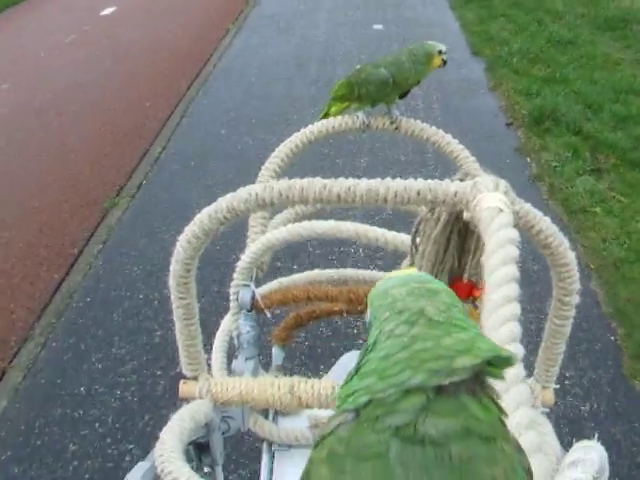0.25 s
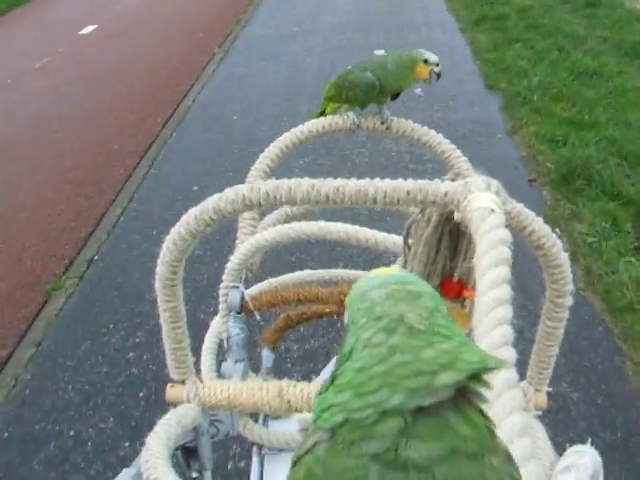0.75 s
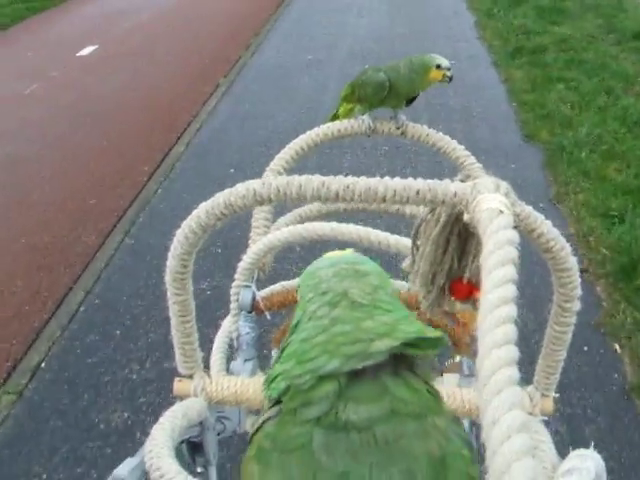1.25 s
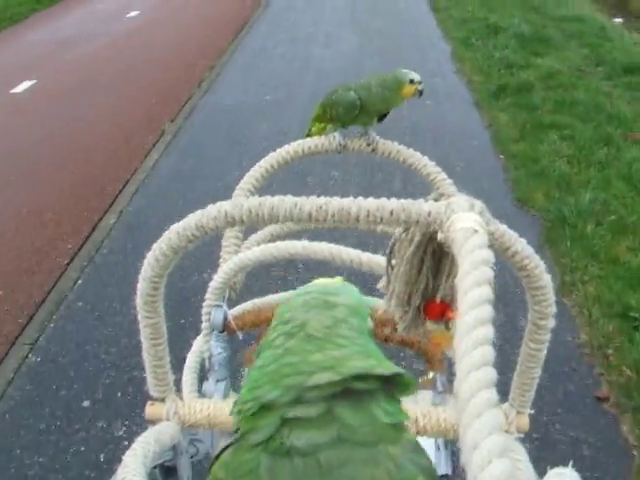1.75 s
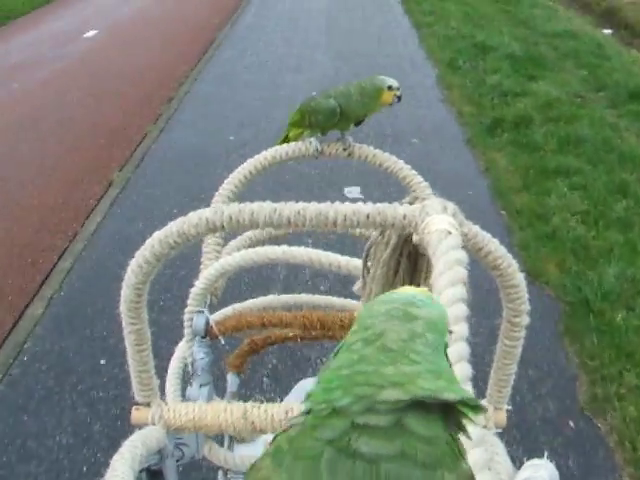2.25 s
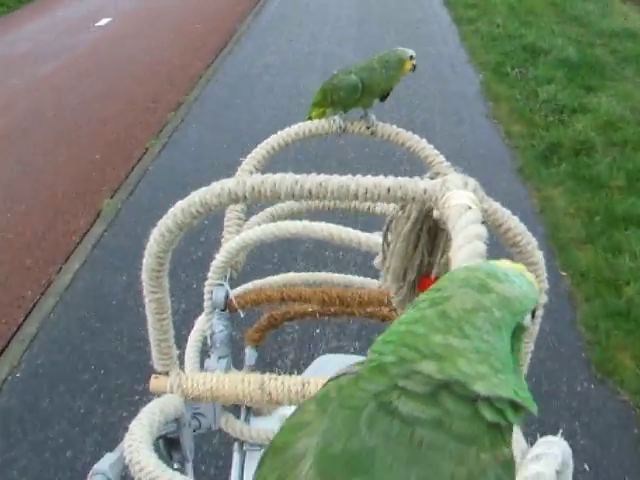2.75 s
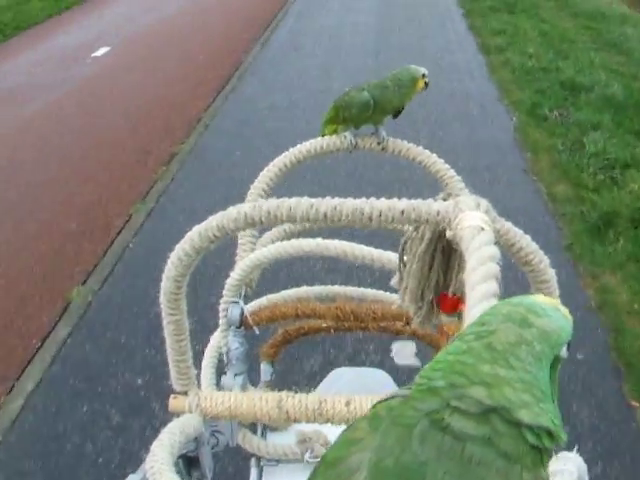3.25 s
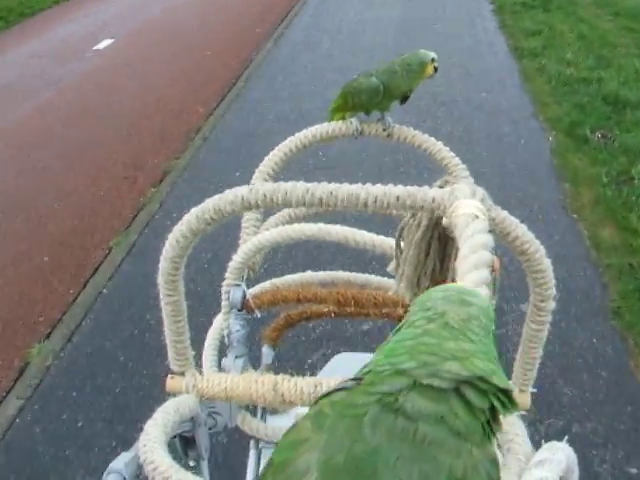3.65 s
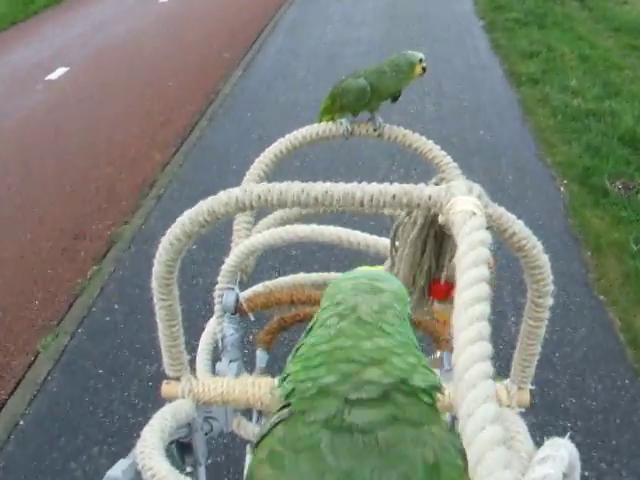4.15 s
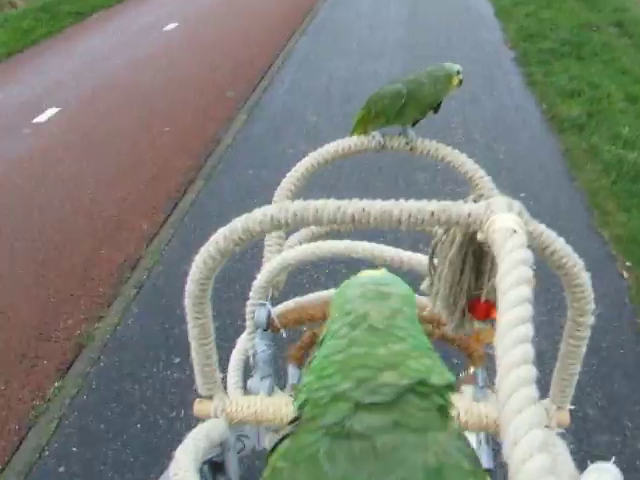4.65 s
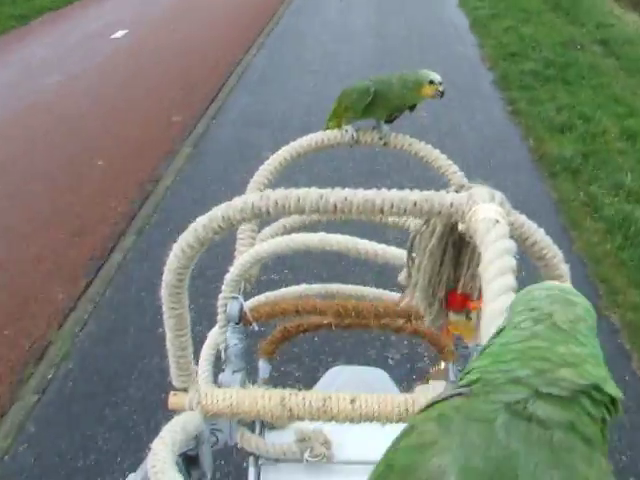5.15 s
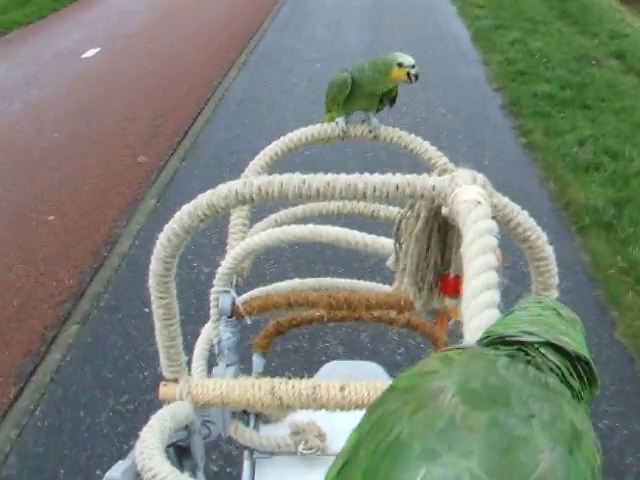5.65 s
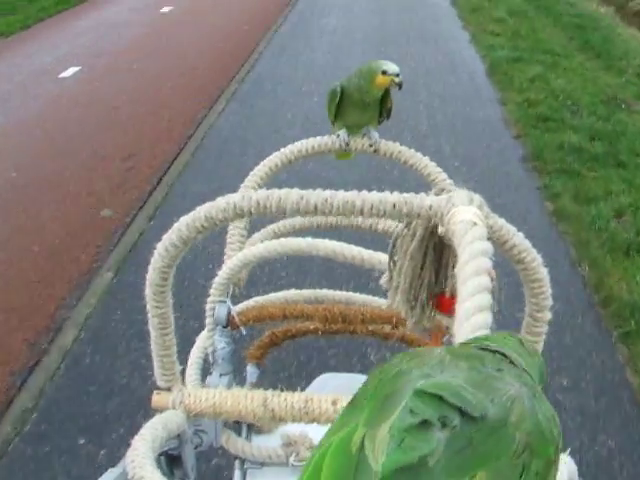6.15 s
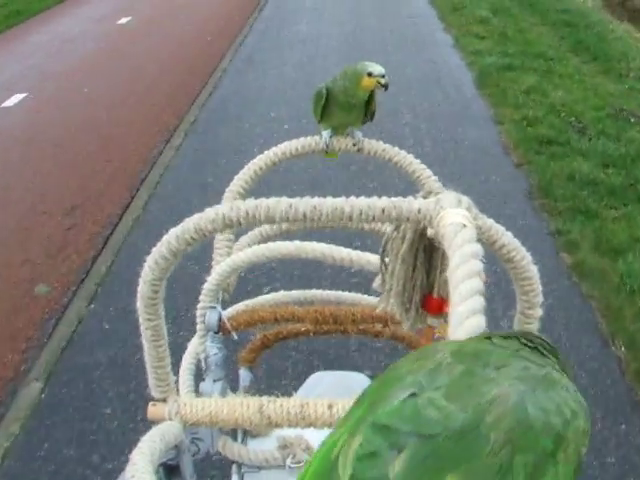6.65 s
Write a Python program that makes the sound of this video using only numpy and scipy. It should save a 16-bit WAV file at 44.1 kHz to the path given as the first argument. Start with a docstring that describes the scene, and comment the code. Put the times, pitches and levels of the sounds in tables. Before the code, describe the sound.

Short, piercing parrot screams repeat steadily outdoors, with wind buffeting the microphone and a faint hum and tyre hiss underneath.

```python
"""A parrot screams close to the microphone, nine times, from a rope perch on a cart rolling along an open path.
Each squawk swoops up through a rasp to a piercing held note, sometimes cracks upward, and ends in a
harsh scrape: membranes in the syrinx pulse, evenly or roughly, through the resonances of the throat.
Underneath, the drive hums, the tyres hiss on asphalt, wind buffets the microphone and bumps ring the frame."""
import sys
import numpy as np
from scipy import signal
from scipy.fft import rfft, irfft, next_fast_len
from scipy.io import wavfile
from scipy.ndimage import uniform_filter1d

SR = 44100
rng = np.random.default_rng(int(sys.argv[2]) if len(sys.argv) > 2 else 0)


def materialize(psi):
    """Save the field psi as 16-bit PCM at rate SR to the path in sys.argv[1].

    A 1-D psi becomes a single channel; in a 2-D psi each row is a channel.
    """
    bounded = np.clip(np.atleast_2d(psi).T, -1, 1)
    quanta = np.round(bounded * 32767).astype(np.int16)
    wavfile.write(sys.argv[1], SR, quanta)


N = 303849
TIME = np.arange(N) / SR


def from_db(db):
    """Decibels to gain."""
    return 10 ** (np.asarray(db) / 20)


def ramp(x):
    """Hold a progress between 0 and 1."""
    return np.clip(x, 0, 1)


def swell(centre_s, length_s):
    """A smooth bump of height 1."""
    return np.cos(np.pi * np.clip((TIME - centre_s) / length_s, -.5, .5)) ** 2


def in_time(rows):
    """Each column after the first (time_s), read at every sample."""
    time_s, *columns = np.transpose(rows)
    return [np.interp(TIME, time_s, column) for column in columns]


def rms_one(x):
    """Scale to unit rms."""
    return x / np.sqrt(np.mean(x ** 2) + 1e-20)


def evened(x, window_s=0.0043):
    """Hold the short-term rms at 1."""
    return x / np.sqrt(np.abs(uniform_filter1d(x ** 2, int(window_s * SR))) + 1e-12)


def filtered(x, order, edge_hz, kind="low"):
    """Causal low-, high- or band-pass."""
    return signal.sosfilt(signal.butter(order, edge_hz, kind, fs=SR, output="sos"), x)


def coloured(x, spectrum):
    """Minimum-phase filter through points of (frequency_hz, gain_db) on a log-frequency axis."""
    size = next_fast_len(N + SR // 2, real=True)
    bin_hz = np.arange(size // 2 + 1) * SR / size
    point_hz, point_db = np.transpose(spectrum)
    gain_db = np.interp(np.log(np.maximum(bin_hz, 1)), np.log(point_hz), point_db)
    cepstrum = irfft(np.log(from_db(gain_db)), size)
    cepstrum[1:size // 2] *= 2
    cepstrum[size // 2 + 1:] = 0
    return irfft(rfft(x, size) * np.exp(rfft(cepstrum)), size)[:N]


def noise(spectrum):
    """Coloured noise of unit rms."""
    return rms_one(coloured(rng.standard_normal(N), spectrum))


def drift(rate_hz):
    """Random wander of unit rms, up to the given rate."""
    return rms_one(filtered(rng.standard_normal(N + SR), 2, rate_hz)[SR:])


START_HZ, END_HZ = 381.3, 607.3   # the swoop rises from the first; the scrape sags to the second
BEAK_HALF_HZ, BEAK_WIDE_HZ = 684, 722   # the beak opens as the pitch climbs through this range
ONSET_ROUGH, SCRAPE_ROUGH = 0.34, 0.83
NOTE_DB, NOTE_SWELL_DB, RASP_DB = -16.5, 0.9, -18.5
# treble is the share of the voice's power above TREBLE_HZ
TREBLE_HZ, ONSET_TREBLE_DB, NOTE_TREBLE_DB = 3300, -18, -14.5
NOTE_DIMMING_DB, SCRAPE_DIMMING_DB = -1, -4


def squawk(start_s, swoop_s, note_s, scrape_s, climb_s, first_hz, last_hz, sag_hz,
           note_lift_db, treble_lift_db, rasp_treble_db, swoop_rough, note_rough,
           attack_s=0.043, step_s=.03, lock_s=0.011, break_s=0.02,
           hoarse_after_s=0.042, hoarse_span_s=0.017, brighten_s=0.047, full_bleat_hz=40.5):
    """Control curves of one call: the membranes swoop up, lock into a note and break into a scrape."""
    note_start, note_end, end = start_s + np.cumsum([swoop_s, note_s, scrape_s])
    t = np.linspace(start_s, end, 400)
    age = t - start_s
    holding = ramp((t - note_start) / note_s)
    falling = ramp((t - note_end) / scrape_s)
    note = first_hz + (last_hz - first_hz) * holding - sag_hz * np.sin(np.pi * holding)
    swoop = (START_HZ - first_hz) * np.exp(-age / climb_s) * ramp((note_start - t) / step_s)
    pitch = note + swoop + (END_HZ - last_hz) * np.sin(np.pi / 2 * falling)
    # air pressure builds over the attack and dies along the scrape
    pressure = ramp(age / attack_s) ** 1.48 * (1 - falling ** 1.5) ** 1.55
    swooping = ramp((note_start - t) / lock_s + .5)
    scraping = ramp((t - note_end) / break_s + .5)
    lock = 1 - swooping - scraping
    hoarse = ramp((age - hoarse_after_s) / hoarse_span_s + .5)
    early_rough = ONSET_ROUGH + (swoop_rough - ONSET_ROUGH) * hoarse
    rough = swooping * early_rough + lock * note_rough + scraping * SCRAPE_ROUGH
    # once open, the beak stays open to the end of the call
    opening = ramp((np.maximum.accumulate(pitch) - BEAK_HALF_HZ) / (BEAK_WIDE_HZ - BEAK_HALF_HZ))
    note_db = NOTE_DB + note_lift_db + NOTE_SWELL_DB * np.sin(np.pi * holding)
    level_db = lock * note_db + (1 - lock) * RASP_DB
    note_treble = NOTE_TREBLE_DB + treble_lift_db + NOTE_DIMMING_DB * (holding - .5)
    rasp_treble = np.interp(age, [0, brighten_s], [ONSET_TREBLE_DB, rasp_treble_db])
    rasp_treble += SCRAPE_DIMMING_DB * falling
    treble_db = lock * note_treble + (1 - lock) * rasp_treble
    bleat_hz = full_bleat_hz * note_rough * lock   # a rougher note wavers more
    return np.column_stack([t, pitch, pressure, rough, lock, opening, level_db, treble_db, bleat_hz])


def squeal(pitch, above_hz=820, span_hz=120):
    """How far, 0-1, the tongue lifts the main resonance along with a high note's third partial."""
    return ramp((pitch - above_hz) / span_hz)


# Partials of the syrinx when it swings evenly: harmonic_number, level_db
SYRINX_PARTIALS = [(1, 4.5), (2, 9.5), (3, 6), (4, 3.5), (5, 4.5), (6, 11), (7, 13), (8, 6), (9, 5.5),
                   (10, 12), (11, 6), (12, 2.5), (13, -16)]


def syrinx(pitch, rough, tremor=.0026, flutter=0.042, jitter_rad=0.43, shimmer=0.16,
           lag_rad=.23, air_db=-12, leak=.02, squeal_db=9, partials=19):
    """Membrane pulses: even when clean, uneven in timing and strength when rough."""
    tremble = rms_one(filtered(rng.standard_normal(N), 2, [35, 110], "band"))
    # slack membranes, low in the swoop, swing more regularly and with a flatter spectrum
    tension = ramp(pitch / BEAK_WIDE_HZ)
    pitch = pitch * (1 + (tremor + flutter * rough * tension ** 2) * tremble)
    cycle = 2 * np.pi * np.cumsum(pitch) / SR
    # a slower swing favours every second or third pulse
    subharmonics = drift(25) * np.cos(cycle / 2) + drift(25) * np.cos(cycle / 3)
    slow_swing = .26 * rough * tension ** 2 * subharmonics
    chaos = tension ** 3 * rough ** 1.3
    phase = cycle + jitter_rad * (chaos * drift(260) + slow_swing)
    evenness = ramp(1 - rough) * tension ** 4
    clean_db = np.interp(np.arange(1, partials + 1), *np.transpose(SYRINX_PARTIALS))
    partial_db = [evenness * db for db in clean_db]
    partial_db[2] += squeal_db * squeal(pitch)
    # upper partials lag, so each pulse is a tiny chirp that fills its cycle
    pulses = sum(from_db(db) * np.cos(k * phase - lag_rad * k * k) for k, db in enumerate(partial_db, 1))
    pulses = rms_one(pulses) * (1 + shimmer * chaos * drift(880) + slow_swing)
    # air rushes through once in every cycle
    air = filtered((1 + np.cos(phase)) * rng.standard_normal(N), 2, 1500, "high")
    return pulses + from_db(air_db) * (chaos * rough + leak) * air


# The windpipe with the beak half closed, and wide open: frequency_hz, gain_db
THROAT_HALF_CLOSED = [(350, -22), (590, -12.5), (850, -3.5), (1150, -7), (1650, -7), (2120, 4), (2500, -10),
                      (3150, -6), (3700, -4), (4400, -4.5), (4950, 2.5), (5600, -13.5), (6900, -14.5),
                      (8400, -35)]
THROAT_OPEN = [(400, -23), (660, -14), (950, -10), (1350, -9), (1900, -2), (2200, 8), (2500, -7.5),
               (3250, -8.5), (4050, 4), (4400, 1.5), (4850, 2.5), (5600, -3), (7200, -3.5), (8400, -23)]


def throat(pulses, opening, treble_db):
    """Windpipe and beak colour the pulses; the lows and the treble then share a steady power."""
    voice = opening * coloured(pulses, THROAT_OPEN) + (1 - opening) * coloured(pulses, THROAT_HALF_CLOSED)
    low = signal.sosfiltfilt(signal.butter(4, TREBLE_HZ, fs=SR, output="sos"), voice)
    share = np.clip(from_db(treble_db) ** 2, 0, .75)
    return np.sqrt(1 - share) * evened(low) + np.sqrt(share) * evened(voice - low)


# Breath at the beak: frequency_hz, density_db
BREATH_SPECTRUM = [(4000, -44.5), (7000, -31.5), (7900, 14), (8600, -22)]


def beak_hiss(pressure, opening, level_db=-56):
    """Air hisses through the beak until it opens wide."""
    return ramp(10 * pressure) * from_db(level_db) * (1 - opening) * noise(BREATH_SPECTRUM)


# The calls, close to the microphone, the first already under way: start_s, swoop_s, note_s, scrape_s,
# climb_s (time constant), first_hz, last_hz, sag_hz, note_lift_db, treble_lift_db, rasp_treble_db,
# swoop_rough (0-1), note_rough (0-1)
PARROT_CALLS = [ (-0.14, .12, 0.15, 0.073, .06, 787, 806.6, 4.1, -.5, 0, -7.5, .6, 0.13),
                (0.521, 0.09, 0.23, 0.061, 0.051, 783, 814, 1.7, 0, 2, -4.5, 0.6, 0.08),
                (1.272, .1, 0.23, 0.054, 0.067, 777.5, 763, 14, 0.4, 3, -4, 0.5, 0.13),
                (2.107, 0.11, 0.18, 0.063, 0.07, 768.2, 737.7, 5, -.5, 3, -4, .65, 0.05),
                (2.791, 0.14, .17, .046, 0.06, 751.4, 747.7, 17.2, 0.5, 0, -8, 0.59, 0.11),
                (3.452, 0.1, 0.19, 0.055, 0.054, 707.4, 724, 1.6, -0.5, 0, -8, 0.5, 0.07),
                (4.068, .132, .187, 0.047, .064, 705, 733, 8.4, -0.5, .5, -10, 0.37, 0.06),
                (4.708, .1, 0.23, 0.042, 0.041, 717.5, 762.4, 2.78, 2, -1, -11, .35, 0.12),
                (5.384, 0.16, 0.1, 0.076, 0.089, 831, 779, 5.7, 1.5, 0.5, -5.5, 0.8, 0.14), ]
# Moments when the voice cracks: centre_s, leap_hz, length_s, roughness_change
VOICE_CRACKS = [(0.03, 208.5, .029, 0.2), (0.059, 130, .028, 0), (0.087, 186, .045, 0.1),
                (0.634, -5, 0.045, .45), (0.741, -56, .055, 0.7), (0.802, 52.5, 0.0271, 0),
                (0.819, 58.5, 0.02056, 0.35), (1.499, 41.5, .017, .25), (1.556, 195, .03, 0.09),
                (1.585, 60, .045, 0), (2.98, 26, 0.013, 0), (3.009, 20, 0.0091, 0), (3.051, 17, 0.019, 0.1),
                (3.602, 32.5, .017, .15), (3.686, 38, .019, .05), (3.707, 48.5, .018, .2),
                (3.725, 24, .014, 0), (3.747, 21, .013, 0), (4.879, 41, .022, 0.2),
                (4.906, -5.5, 0.02, 0.2), (4.976, 82.5, .03, 0), (5.019, 114.5, .032, .4),
                (5.557, 151, .045, -.2), (5.608, 95.5, .027, -.1), (5.628, 146.5, .02, -.1)]


def parrot(slip_hz=761.5, slip_width_hz=28, slip_db=-4.5, slip_treble_db=11, crack_slip=.8, crack_db=-2.5,
           squeal_lift_db=5.0, squeal_treble_db=-3, waver_db=1.8, treble_waver_db=2.5):
    """Syrinx through the throat; a note that slips off the main resonance gets weaker and brighter."""
    curves = in_time(np.vstack([squawk(*call) for call in PARROT_CALLS]))
    pitch, pressure, rough, lock, opening, level_db, treble_db, bleat_hz = curves
    pitch += bleat_hz * drift(49)
    cracking = np.zeros(N)
    for centre_s, leap_hz, length_s, roughness_change in VOICE_CRACKS:
        crack = swell(centre_s, length_s)
        pitch += leap_hz * crack
        rough += roughness_change * crack
        cracking += crack
    # a high note or a crack loses the resonance; a squeal finds it again
    too_high = (1 + np.tanh((pitch - slip_hz) / slip_width_hz)) / 2
    slip = lock * np.maximum(too_high, ramp(crack_slip * cracking))
    level_db += slip_db * slip + crack_db * cracking + squeal_lift_db * squeal(pitch)
    treble_db += slip_treble_db * slip + squeal_treble_db * squeal(pitch)
    pulses = syrinx(pitch, np.clip(rough, 0, 1.1))
    # brightness and level waver more when the voice is strained
    strain = np.clip(.25 + 4 * rough, .25, 1)
    voice = throat(pulses, opening, treble_db + treble_waver_db * strain * drift(110))
    voice *= pressure * from_db(level_db + waver_db * strain * drift(66))
    return voice + beak_hiss(pressure, opening)


def open_air(x, ground_db=-24, ground_s=0.027, scatter_db=-35, scatter_t60_s=0.26):
    """The direct sound, one reflection off the path and a faint, dull scatter from the surroundings."""
    ground = np.interp(TIME - ground_s, TIME, x, left=0)
    t = TIME[:SR // 2]
    tail = filtered(rng.standard_normal(len(t)), 1, 2500) * from_db(-60 * t / scatter_t60_s)
    scatter = signal.fftconvolve(x, tail / np.sqrt(np.sum(tail ** 2)))[:N]
    return x + from_db(ground_db) * ground + from_db(scatter_db) * scatter


# Wind right on the microphone, its deep rumble and its buffeting: frequency_hz, density_db
RUMBLE_SPECTRUM = [(12, -14.5), (25, -10), (42, -6.5), (60, -12.5), (100, -12), (300, -78.5)]
BUFFET_SPECTRUM = [(30, -22), (60, -5.5), (88, -5), (125, -6.5), (175, -8.5), (250, -15), (400, -20),
                   (900, -52)]
# Gusts across the open path: centre_s, length_s, rumble_lift_db, buffet_lift_db
WIND_GUSTS = [(1.603, 0.56, 7, -2), (2.574, 0.26, 6.5, 7), (3.029, 0.49, 15.5, 10.5),
              (3.524, .2, 10.5, 10.5), (3.811, 0.36, 11.5, 4.5), (4.253, .2, 15.5, 4.5),
              (6.621, 0.64, 4, 4)]


def wind(rumble_db=-42, buffet_db=-44.5, lumps_db=2):
    """Lumpy turbulence at the microphone: a deep rumble and brighter buffets that follow the gusts."""
    for centre_s, length_s, rumble_lift_db, buffet_lift_db in WIND_GUSTS:
        gust = swell(centre_s, length_s)
        rumble_db += rumble_lift_db * gust
        buffet_db += buffet_lift_db * gust
    rumble = from_db(rumble_db + lumps_db * drift(5)) * noise(RUMBLE_SPECTRUM)
    buffets = from_db(buffet_db + lumps_db * drift(8.4)) * noise(BUFFET_SPECTRUM)
    return rumble + buffets


# Tones of the cart's drive: pitch_hz, level_db
DRIVE_TONES = [(60.7, -37), (224, -56.5)]


def drive_hum(speed_wobble=0.009, waver_db=2):
    """The drive turns at a nearly steady speed; each of its tones wavers in level."""
    turning_s = np.cumsum(1 + speed_wobble * drift(2.77)) / SR
    return sum(from_db(level_db + waver_db * drift(4)) * np.sin(2 * np.pi * pitch_hz * turning_s)
               for pitch_hz, level_db in DRIVE_TONES)


# Tyres and open air along the path: time_s, level_db
TYRE_LEVELS = [(0, -50), (1.1, -50.5), (3.3, -50), (4.6, -49.5), (5.9, -49.5), (6.89, -46.5)]
# Their colour at the microphone: frequency_hz, density_db
TYRE_SPECTRUM = [(180, -30.5), (300, -14.5), (404, -5.5), (452, -6), (600, -8), (917, -3.5), (1970, -13.5),
                 (3320, -16), (3880, -17), (7240, -18.5), (8100, -23), (8820, -86), (11500, -69),
                 (19400, -120)]


def tyre_hiss(texture_db=.9):
    """The tyres hiss over the asphalt, a little unevenly."""
    level_db, = in_time(TYRE_LEVELS)
    return from_db(level_db + texture_db * drift(8)) * noise(TYRE_SPECTRUM)


# Bumps in the path: start_s, level_db
PATH_BUMPS = [(1.779, -24), (2.555, -21.5), (2.59, -28), (3.019, -12.5), (3.041, -33), (3.148, -13.5),
              (3.211, -24), (3.845, -18.5)]
# Dull modes of the cart's frame: pitch_hz, level_db, t60_s
FRAME_MODES = [(96.7, 2, 0.056), (117.5, 3, 0.027), (166, -7.5, .06), (243, -10.5, 0.074), (326, -30, .04)]


def jolts(contact_s=0.0042, spread_db=1.5):
    """Each bump is a soft push that rings the frame, every mode with a strength of its own."""
    out = np.zeros(N)
    t = TIME[:SR // 4]
    for start_s, level_db in PATH_BUMPS:
        chance_db = rng.normal(0, spread_db, len(FRAME_MODES))
        thud = sum(from_db(level_db + mode_db + own_db - 60 * t / t60_s) * np.sin(2 * np.pi * hz * t)
                   for (hz, mode_db, t60_s), own_db in zip(FRAME_MODES, chance_db))
        start = round(start_s * SR)
        out[start:start + len(t)] += thud * (1 - np.exp(-t / contact_s))
    return out


def scene(parrot_db=2.5):
    """One microphone on an open path: the parrot close by, wind and cart underneath."""
    return (from_db(parrot_db) * open_air(parrot()) + wind() + drive_hum() + tyre_hiss() + jolts())[None]


def gain_control(x, threshold_db=-21, slope=0.48, recovery_db_per_s=24, attack_s=0.0029):
    """Loud sound turns the gain down at once; the background creeps back afterwards."""
    level_db = 10 * np.log10(np.abs(uniform_filter1d(x ** 2, SR // 100)) + 1e-12)
    wanted_cut_db = slope * np.maximum(level_db - threshold_db, 0)
    recovered_db = recovery_db_per_s * TIME
    cut_db = np.maximum.accumulate(wanted_cut_db + recovered_db, axis=-1) - recovered_db
    pole = np.exp(-1 / (attack_s * SR))
    return x * from_db(-signal.lfilter([1 - pole], [1, -pole], cut_db))


def record(dry, ceiling=.52, cutoff_hz=8700):
    """The recorder rides its gain, rounds the highest peaks and cuts the top steeply."""
    held = gain_control(dry)
    rounded = held / (1 + (held / ceiling) ** 6) ** (1 / 6)
    return signal.sosfilt(signal.ellip(10, .2, 90, cutoff_hz, fs=SR, output="sos"), rounded)


dry = scene()
out = record(dry)
materialize(out)
```